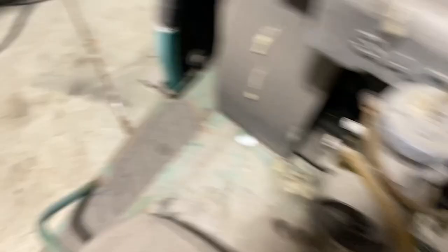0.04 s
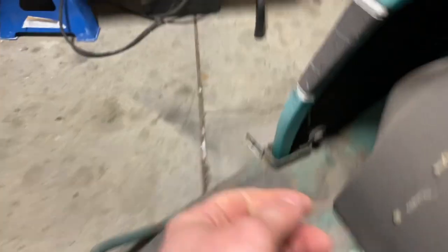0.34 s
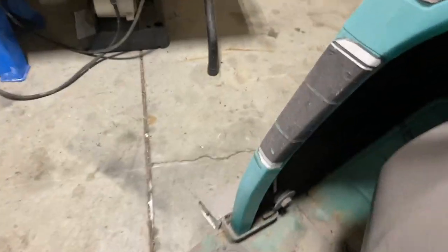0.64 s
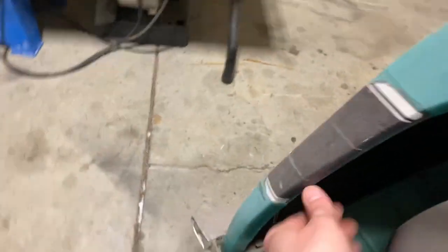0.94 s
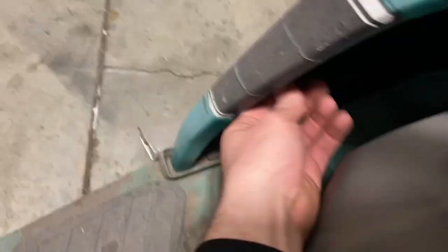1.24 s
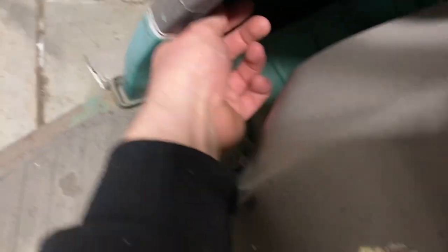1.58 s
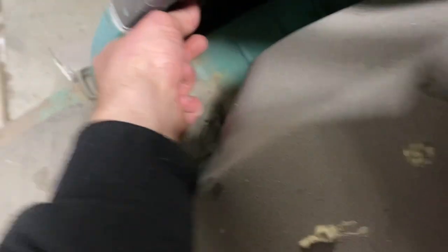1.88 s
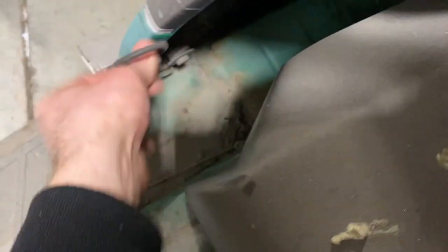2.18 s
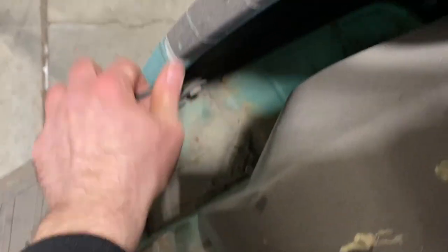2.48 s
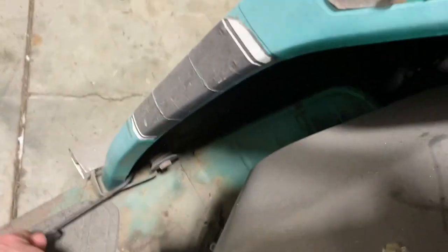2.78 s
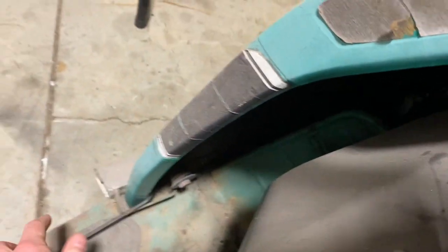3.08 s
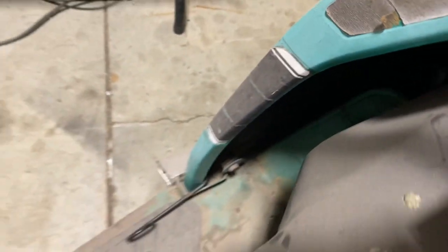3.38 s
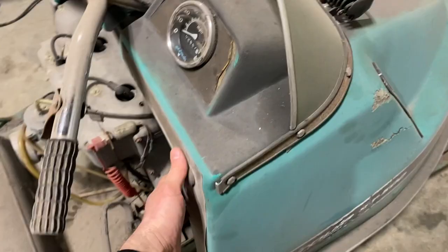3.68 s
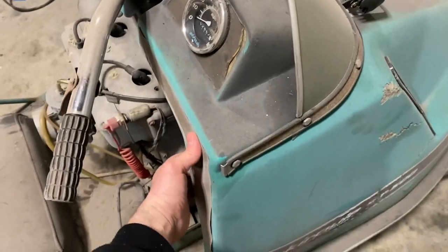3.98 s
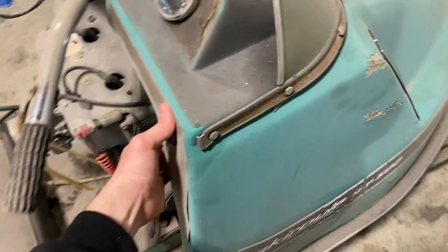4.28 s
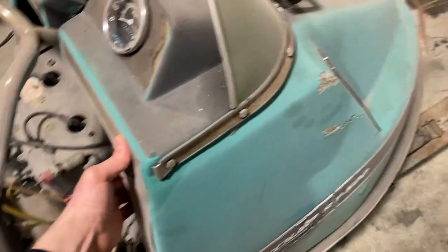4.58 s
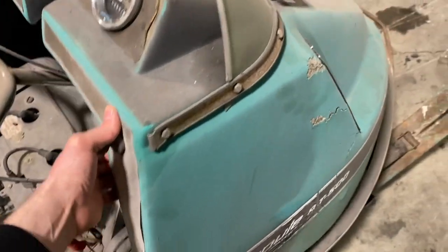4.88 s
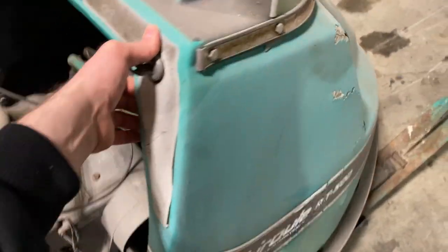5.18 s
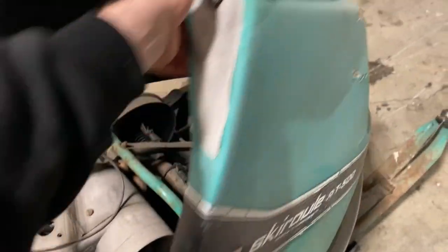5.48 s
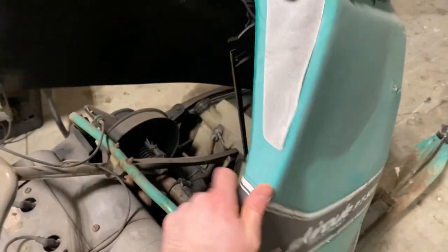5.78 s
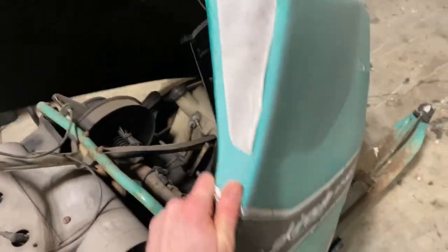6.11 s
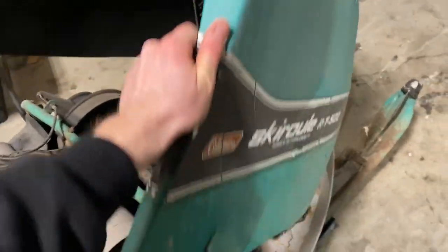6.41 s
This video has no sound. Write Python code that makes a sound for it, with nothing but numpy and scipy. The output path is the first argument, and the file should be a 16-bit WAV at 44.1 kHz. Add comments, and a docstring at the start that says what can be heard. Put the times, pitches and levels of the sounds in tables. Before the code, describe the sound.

A hand bumps and scrapes an old snowmobile's hollow hood, clicks its metal latches and swings it open in a garage.

```python
"""A hand scuffs and bumps an old snowmobile's moulded hood over a faint mains hum, works the metal
latches, then swings the hood open in a garage. Each blow cracks first and booms a moment later as the
shell takes it up. Latch steel clicks, rings and squeals; the rim drags and snags on the chassis.
The hard room answers with a dense tail."""
import sys
import numpy as np
from scipy import signal
from scipy.fft import rfft, irfft, next_fast_len
from scipy.io import wavfile

SR = 44100
rng = np.random.default_rng(int(sys.argv[2]) if len(sys.argv) > 2 else 0)


def dump(signal):
    """Clip the signal to [-1, 1] and save it as 16-bit WAV at the path in sys.argv[1]."""
    limited = np.clip(np.atleast_2d(signal).T, -1, 1)
    pcm = np.round(limited * 32767).astype(np.int16)
    wavfile.write(sys.argv[1], SR, pcm)


N = 293265
TIME = np.arange(N) / SR
BANDS_HZ = 45 * 2 ** (np.arange(18) / 2)

# Hood panel modes. Each row: frequency in Hz, relative level in dB, t60 in seconds.
PANEL_MODES = [(168, 10.5, 0.21), (231, 11.5, 0.13), (262.7, -1.5, 0.3), (299.9, 4, 0.28),
               (341.5, -5, 0.33), (379.7, 5, 0.14), (450.9, 1, 0.16), (520.2, -0.5, 0.14), (620, 2.5, 0.13),
               (652, 5.5, 0.13), (723, 6.5, 0.1), (870, 5.5, 0.077), (1022, 3, 0.072), (1072, 2.5, 0.13),
               (1175, -1, 0.15)]
# Latch and rod modes. Each row: frequency in Hz, relative level in dB, t60 in seconds.
STEEL_MODES = [(1300, -4.5, 0.095), (1302, 12.5, 0.057), (1460, 5.5, 0.074), (1545, 9.5, 0.13),
               (1680, 0.5, 0.077), (1913, 0, 0.43), (2190, 7.5, 0.35), (2390, 8.5, 0.36),
               (2486, 3.5, 0.078), (2662, 4, 0.72), (3270, -4, 0.47), (4104, -11.5, 0.31)]
# Stereo width. Each row: frequency in Hz, side minus mid in dB.
STEREO_WIDTH = [(60, -16), (130, -17), (270, -14), (520, -7), (1000, -3), (2200, -1.5), (5000, -3),
                (11000, -1.5)]


def undb(db):
    """Decibels to gain."""
    return 10 ** (np.asarray(db) / 20)


def read(table, hz):
    """Interpolate (Hz, value) rows on a log-frequency axis."""
    f, value = np.transpose(table)
    return np.interp(np.log(hz), np.log(f), value)


def unit(x):
    """Scale to rms 1."""
    return x / np.sqrt(np.mean(x ** 2) + 1e-18)


def unit_onset(x, size=1100):
    """Scale to rms 1 over the first size samples."""
    return x / np.sqrt(np.mean(x[..., :size] ** 2) + 1e-18)


def fade(t, t60_s):
    """Fall by 60 dB in t60_s."""
    return np.exp(-np.log(1000) * t / np.maximum(t60_s, 1e-3))


def add(out, start_s, x):
    """Mix x in at start_s."""
    i = max(int(start_s * SR), 0)
    out[:, i:i + x.shape[-1]] += x[..., :max(N - i, 0)]


def walk(rate_hz, size):
    """Gaussian values, rate_hz a second, joined by lines."""
    knots = rng.standard_normal(size // 8 + 2)
    return np.interp(np.arange(size) * rate_hz / SR, np.arange(len(knots)), knots)


def noise(gain, size):
    """Stereo noise with spectrum gain(hz): bass alike on both sides, treble out of step."""
    hz = np.maximum(np.arange(size // 2 + 1) * SR / size, 1)
    mid, diffuse = rfft(rng.standard_normal((2, size)))
    direct = np.clip(hz / 11000, 0, .9)
    side = (1j * np.sqrt(direct) * mid + np.sqrt(1 - direct) * diffuse) * undb(read(STEREO_WIDTH, hz))
    return unit(irfft(np.array([mid + side, mid - side]) * gain(hz), size))


def band(centre_hz, size):
    """Half-octave noise."""
    return noise(lambda hz: np.cos(np.pi / 2 * np.minimum(2 * abs(np.log2(hz / centre_hz)), 1)), size)


def resonant_noise(centre_hz, q, size):
    """Noise through one resonance."""
    return noise(lambda hz: 1 / np.hypot(1, q * (hz / centre_hz - centre_hz / hz)), size)


def coloured(spectrum):
    """Scene-long noise shaped by (Hz, dB) rows."""
    return noise(lambda hz: undb(read(spectrum, hz)), next_fast_len(N))[:, :N]


def effort(start_s, swell_s, hold_s, t60_s):
    """Envelope of one push: build, hold, die away."""
    t = TIME - start_s
    return np.clip(t / max(swell_s, 1e-3), 0, 1) * fade(np.maximum(t - swell_s - hold_s, 0), t60_s)


def focus(hz, centre_hz, octaves):
    """A contact's spot and hardness favour the modes near centre_hz."""
    return 1 / (1 + (np.log2(hz / centre_hz) / octaves) ** 2)


def ring(modes, centre_hz, octaves, rise_s, scatter_db=2.5, size=22050):
    """Decaying modes of a struck object; each contact excites them a little differently."""
    hz, db, t60_s = np.transpose(modes)
    t = TIME[:size]
    detune, scatter, phase, side_re, side_im = rng.standard_normal((5, len(hz)))
    poles = 2j * np.pi * hz * (1 + 0.0086 * detune) - np.log(1000) / t60_s
    weight = focus(hz, centre_hz, octaves) * undb(db + scatter_db * scatter) * np.exp(1j * np.pi * phase)
    side = undb(read(STEREO_WIDTH, hz)) * (side_re + 1j * side_im) / np.sqrt(2)
    waves = np.exp(poles.astype(np.complex64)[:, None] * t.astype(np.float32))
    stereo = (weight * np.array([1 + side, 1 - side])) @ waves
    return unit_onset(stereo.imag * (1 - np.exp(-t / rise_s)), size=1500)


def room_tone(air_db=-57, hum_db=-60.5, hum_hz=120):
    """Quiet air and mains hum, both wavering in level."""
    # Each row: frequency in Hz, relative density in dB.
    air_spectrum = [(25, -44), (55, 7), (100, -4), (250, -11.5), (500, -21.5), (1200, -16.5), (2200, -19.5),
                    (3000, -27.5), (6200, -23.5), (16000, -37)]
    air = coloured(air_spectrum) * undb(air_db + .5 * walk(3.4, N))
    hum = np.sqrt(2) * np.sin(2 * np.pi * hum_hz * TIME)
    return air + hum * undb(hum_db + walk(7.9, N))


def hand_scuffs():
    """Skin and sleeve skid on the paint: a bright, grainy hiss."""
    # Each row: start, swell and hold in seconds, level in dB.
    skids = [(0.0, 0.0027, 0.085, -51.5), (0.342, 0.012, 0.035, -46), (1.056, 0.011, 0.011, -31.5),
             (0.6, 0.35, 0.64, -56.5), (1.416, 0.0079, 0.032, -40), (4.023, 0.082, 0.019, -19),
             (4.727, 0.005, 0.046, -35.5), (5.047, .015, 0.018, -54), (5.216, 0.028, 0.064, -59.5),
             (5.48, 0.12, 0.024, -41.5)]
    # Each row: frequency in Hz, relative density in dB.
    skid_spectrum = [(1000, 0), (3000, 5), (7000, 3.5), (10400, 11), (15500, 7.5)]
    push = sum(undb(db) * effort(*timing, t60_s=0.04) for *timing, db in skids)
    return push * unit(coloured(skid_spectrum) * undb(1.3 * walk(150, N) + 1.8 * walk(1300, N)))


def hood_blows(size=8192):
    """Bending waves spread from each contact, treble first; panels, fittings and the whole hood ring."""
    # Hard contacts. Each row: start in seconds, boom in dB, knock in dB, knock centre in Hz,
    # clack in dB, treble tick in dB; levels before the offsets below.
    blows = [(0.266, -39, -39.5, 378, -52.5, -62), (0.452, -29, -32, 320, -63, -74),
             (0.536, -29, -38, 360, -43, -55), (0.688, -32, -34.5, 495, -47, -66),
             (1.082, -56, -29, 407, -44, -62), (1.603, -33, -41, 316, -46, -56),
             (1.727, -54, -30, 740, -27, -44), (1.742, -27.5, -13, 273, -52, -58),
             (1.749, -39, -21, 612, -54, -50), (1.936, -41, -26.5, 543, -26, -30.5),
             (1.996, -12, -17.5, 680, -19, -39), (2.008, -17.5, -15.5, 360, -52, -49),
             (2.196, -29, -33, 393, -35, -39.5), (2.207, -31.5, -33, 574, -35.5, -40),
             (2.221, -42, -24, 466, -24.5, -50), (2.241, -15, -22, 430, -26.5, -33.5),
             (2.527, -37.5, -17, 904, -21, -45), (2.537, -27, -16.5, 363, -54, -70),
             (2.568, -41, -25.5, 1020, -33, -62), (2.594, -16.5, -15.5, 373, -31, -31.5),
             (2.642, -16, -16.5, 390, -22, -28.5), (2.668, -14.5, -14.5, 524, -22, -27),
             (2.692, -22, -21, 1070, -27.5, -43), (2.706, -41.5, -21, 610, -20.5, -31.5),
             (2.723, -42.5, -22.5, 604, -19.5, -41), (2.739, -50, -15.5, 594, -20.5, -37),
             (2.794, -49, -48, 368, -18.5, -28.5), (3.024, -34, -25, 495, -22, -49),
             (3.049, -17, -20.5, 415, -23, -39.5), (3.954, -35, -39, 282, -41, -45.5),
             (4.094, -14.5, -13.5, 452, -31.5, -53), (4.106, -14.5, -24, 900, -27.5, -55),
             (4.116, -20, -20, 297, -26, -48), (4.167, -41.5, -18.5, 355, -28.5, -35),
             (4.205, -47.5, -28.5, 303, -28, -38), (4.275, -21, -22, 348, -34, -53),
             (4.387, -25.5, -26.5, 384, -40, -56), (4.64, -59, -30.5, 240, -61, -70),
             (4.762, -37, -34, 360, -32.5, -31), (4.784, -34.5, -28.5, 415, -30, -58.5),
             (5.655, -47, -23.5, 452, -36, -49), (5.667, -42.5, -20.5, 447, -29.5, -34.5),
             (5.688, -29, -25.5, 312, -44, -62), (5.913, -46, -24.5, 407, -35.5, -69),
             (5.924, -29.5, -22.5, 445, -31, -52), (5.946, -23, -27, 440, -47, -45),
             (6.271, -53, -27.5, 861, -38, -44.5), (6.272, -44, -24.5, 440, -47, -58),
             (6.295, -43, -25.5, 312, -40, -45), (6.362, -28, -24.5, 570, -32, -53),
             (6.407, -46, -23, 433, -28, -38), (6.443, -57, -21.5, 660, -34, -41)]
    # Soft contacts of the hand and the settling hood. Each row: start in seconds, boom in dB as above.
    bumps = [(0.297, -26), (0.349, -28.5), (0.482, -25), (0.735, -32), (1.012, -26), (1.079, -19),
             (1.386, -26.5), (2.254, -23), (2.379, -23.5), (3.073, -22.5), (3.109, -31.5), (4.429, -21.5)]
    # Each grip changes flex and damping. Each row: start in seconds, boom centre in Hz, shell t60 factor.
    grips = [(0, 111.4, 0.89), (0.9, 102.8, 0.43), (1.55, 105, 0.33), (1.9, 101, 0.53), (2.15, 95.5, 0.62),
             (2.5, 113, 0.95), (2.95, 103.5, 0.81), (3.6, 133, 0.87), (5.5, 125, 0.68), (5.88, 59.6, 0.51),
             (6.15, 126, 1)]
    # Bending-wave decay. Each row: frequency in Hz, t60 in seconds before the grip's factor.
    shell_t60 = [(170, 0.44), (500, 0.39), (1500, 0.17), (5000, 0.17), (14000, 0.12)]
    # Whole-hood flexing. Each row: frequency in Hz, relative level in dB, t60 in seconds.
    flex_modes = [(57, 13, 0.14), (70, 6, 0.28), (89.4, 4, 0.3), (107, 7, 0.22), (120, 0, 0.36),
                  (146.4, 0, 0.26)]
    # Flesh barely wakes the panels.
    soft_blows = [(start_s, db, db - 12.5, 275, db - 54, db - 54) for start_s, db in bumps]
    out, t = np.zeros((2, N)), TIME[:size]
    band_noise = {hz: band(hz, 16 * size) for hz in BANDS_HZ[4:]}
    for start_s, boom_db, knock_db, knock_hz, clack_db, tick_db in blows + soft_blows:
        _, boom_hz, t60_factor = grips[sum(grip[0] <= start_s for grip in grips[1:])]
        crack_spectrum = [(250, clack_db - 25), (1100, clack_db - 4), (1700, clack_db - 5),
                          (3000, clack_db - 9), (5500, tick_db - 4), (14000, tick_db - 8)]
        chatter = undb(0.42 * walk(580, size))  # the loose rim rattles as it lands
        offset = rng.integers(15 * size)
        for hz, waves in band_noise.items():
            rise_s = 0.003 * (400 / hz) ** 0.96  # low bending waves travel slowly
            envelope = (1 - np.exp(-(t / rise_s) ** 2)) * fade(t, t60_factor * read(shell_t60, hz))
            thud = undb(knock_db - 12.5) * focus(hz, knock_hz, octaves=5.36) ** 2 / (1 + (hz / 1100) ** 4)
            gain = np.hypot(undb(read(crack_spectrum, hz)), thud)
            add(out, start_s, gain * unit_onset(waves[:, offset:offset + size] * envelope * chatter))
        panels = ring(PANEL_MODES, knock_hz, octaves=0.3, rise_s=0.0022, scatter_db=3.0)
        fittings = ring(STEEL_MODES, centre_hz=1400, octaves=0.33, rise_s=0.0012)
        boom = ring(flex_modes, boom_hz, octaves=0.26, rise_s=0.0015, scatter_db=4.5)
        add(out, start_s + 0.00089, undb(knock_db) * panels)
        add(out, start_s + 0.003163, undb(clack_db - 8) * fittings)
        add(out, start_s + 0.0039, undb(boom_db - 2) * boom)
    return out


def stick_slip(rate_hz, t60_s, spread_db, slide):
    """Friction envelope: random, decaying releases over steady sliding."""
    releases = rng.random(N) < rate_hz / SR
    strength = undb(spread_db * np.clip(rng.standard_normal(N), -2, 2))
    power = signal.fftconvolve(releases * strength ** 2, fade(TIME[:8192], t60_s) ** 2)[:N]
    return np.sqrt(abs(power) / np.mean(power) + slide ** 2)


def hollow_gain(hz, half_width_hz=14):
    """The shell favours its panel frequencies."""
    return 1 + sum(1 / (1 + ((hz - mode[0]) / half_width_hz) ** 2) for mode in PANEL_MODES[1:])


def hood_drag():
    """Dry rubbing over the chassis: the hollow shell judders, the rim scrapes."""
    # Pushes and pulls. Each row: start, swell and hold in seconds, judder in dB, scrape in dB.
    strokes = [(0.274, 0.024, 0.29, -43, -46.5), (0.354, 0.023, 0.0059, -43, -52),
               (0.632, 0.025, 0.005, -39.5, -42.5), (0.723, 0.077, 0.38, -79, -53),
               (0.967, 0.024, 0.032, -42, -53), (1.05, 0.01, 0.0075, -36.5, -38.5),
               (1.33, 0.023, 0.0099, -47.5, -54.5), (1.432, 0.0099, 0.032, -40.5, -47.5),
               (1.586, 0.14, 0.047, -32.5, -36.5), (2.095, 0.077, 0.19, -35.5, -48.5),
               (2.497, 0.19, 0.022, -17.5, -27), (2.784, 0.038, 0.022, -31.5, -47),
               (3.015, 0.11, 0.037, -41, -46.5), (3.596, 0.097, 0.035, -56, -47),
               (4.039, 0.099, 0.1, -19, -23), (4.583, 0.067, 0.17, -34, -41.5),
               (5.461, 0.21, 0.37, -34, -42.5), (5.602, 0.07, 0.016, -26.5, -34),
               (6.226, 0.063, 0.23, -31, -47.5), (6.371, 0.052, 0.013, -36, -29)]
    # Each row of both: frequency in Hz, relative density in dB.
    judder_spectrum = [(40, -2), (70, -18), (120, 9.5), (200, -5.5), (400, -6), (800, -15), (1600, -17),
                       (4000, -43.5)]
    scrape_spectrum = [(300, -37), (900, -21.5), (2200, -16), (4000, -16), (7000, -17.5), (10400, -22),
                       (13500, -24), (15500, -15)]
    judder_power, scrape_power = undb(-60) ** 2, undb(-67) ** 2  # the hand never quite keeps still
    for *timing, judder_db, scrape_db in strokes:
        judder_power += (undb(judder_db) * effort(*timing, t60_s=0.79)) ** 2
        scrape_power += (undb(scrape_db) * effort(*timing, t60_s=0.64)) ** 2
    slips = stick_slip(rate_hz=50, t60_s=0.17, spread_db=6.5, slide=0.97)
    rasp = stick_slip(rate_hz=330, t60_s=0.015, spread_db=3.0, slide=1.0)
    body = noise(lambda hz: undb(read(judder_spectrum, hz)) * hollow_gain(hz), next_fast_len(N))[:, :N]
    judder = unit(body * slips)
    scrape = unit(coloured(scrape_spectrum) * rasp)
    return judder * np.sqrt(judder_power) + scrape * np.sqrt(scrape_power)


def clicks_and_scuffs(size=4096, ring_size=33075):
    """Sharp clicks and short bright scuffs, some followed by a shimmering metallic ring."""
    # Each row: start in seconds, level in dB, centre in Hz, t60 in seconds, Q, ring trim in dB.
    bursts = [(0.34, -33.5, 9460, 0.052, 1.1, -10), (0.452, -43.5, 3800, 0.085, 4.8, -12),
              (0.854, -38, 6600, 0.016, 14, -40), (1.064, -38.5, 3200, 0.054, 1.8, -25),
              (1.077, -42, 3240, 0.06, 5, -16), (1.604, -36, 9800, 0.047, 1.5, -8),
              (1.687, -22.5, 7950, 0.062, 1, -7), (1.7, -21, 9700, 0.065, 0.31, -28),
              (1.745, -21, 8600, 0.11, 0.32, -28), (1.89, -31.5, 9800, 0.069, 0.37, -31.5),
              (1.936, -17, 9340, 0.013, 1.5, -23), (1.989, -18, 10600, 0.088, 1, -30),
              (1.994, -16.5, 3030, 0.078, 3, -35), (2.24, -25, 9350, 0.043, 0.55, -27),
              (2.269, -30, 10900, 0.055, 0.48, -26), (2.516, -33.5, 8900, 0.08, 2.2, -1),
              (2.658, -22, 4260, 0.03, 4, -16), (2.741, -24, 7200, 0.021, 1.3, -31),
              (2.796, -24, 1530, 0.072, 3.1, 6), (3.026, -19, 7600, 0.016, 0.61, -19),
              (3.027, -18, 2564, 0.11, 4.3, -4), (3.049, -19.5, 4650, 0.02, 4.8, -36),
              (3.349, -52.5, 3870, 0.028, 7.4, -39), (3.945, -23, 11340, 0.11, 0.81, -38),
              (4.217, -18, 7800, 0.031, 1.5, -6.5), (4.688, -34, 10300, 0.042, 2.3, -29.5),
              (4.760, -18.5, 4030, 0.09, 2.4, -40), (4.77, -20.5, 6050, 0.037, 0.85, -27),
              (4.795, -22, 2240, 0.021, 1.6, -11), (5.922, -29, 1670, 0.072, 3.4, 2),
              (6.361, -17, 3880, 0.078, 0.62, -9), (6.364, -36, 9700, 0.04, 1.1, -31)]
    out, t = np.zeros((2, N)), TIME[:size]
    for start_s, db, centre_hz, t60_s, q, ring_db in bursts:
        burst = resonant_noise(centre_hz, q, size)
        envelope = (1 - np.exp(-t * centre_hz / 3)) * fade(t, t60_s)  # builds over a few cycles
        grain = undb(2.2 * walk(1360, size))
        add(out, start_s, undb(db) * unit_onset(burst * envelope * grain, size=440))
        tone = ring(STEEL_MODES, centre_hz, octaves=0.22, rise_s=0.00061, size=ring_size)
        shimmer = undb(3.5 * walk(60, ring_size))
        add(out, start_s, undb(db + ring_db - 12) * tone * shimmer)
    return out


def rim_snags(size=2048):
    """The dragged rim hangs on an edge and breaks free with a dry crack."""
    # Each row: start in seconds, level in dB, centre in Hz.
    snags = [(2.592, -37, 3800), (2.643, -23.5, 3600), (2.668, -24.5, 4600), (2.68, -25.5, 3600),
             (2.693, -26, 2300), (2.695, -31, 5500), (2.706, -18, 3506), (2.718, -22.5, 3100),
             (2.738, -20.5, 3000), (2.753, -28.5, 2010), (2.776, -26, 2420), (2.819, -25.5, 3800),
             (4.083, -39, 3170), (4.134, -29, 4400), (4.176, -21.5, 6600), (4.181, -25, 4700),
             (4.205, -27, 2500), (4.247, -26, 7000), (4.756, -26, 4000)]
    out = np.zeros((2, N))
    for start_s, db, centre_hz in snags:
        crack = resonant_noise(centre_hz, q=3.3, size=size) * fade(TIME[:size], t60_s=0.028)
        add(out, start_s, undb(db) * unit_onset(crack, size=220))
    return out


def squeals():
    """Steel squeals or the shell groans under load: uneven slips make a short, rough tone."""
    # One table per tone. Each row: time in seconds, slip rate in Hz, level in dB.
    glides = [
        [(2.785, 1490, -21), (2.805, 1554, -22), (2.828, 1561, -17.5), (2.84, 1540, -32)],
        [(4.736, 4400, -38), (4.76, 4270, -34)],
        [(4.795, 2180, -23), (4.807, 2140, -28)],
        [(5.36, 477, -58), (5.385, 459, -47), (5.415, 484, -68)],
        [(2.668, 610, -18.5), (2.712, 620, -25.5), (2.735, 636, -9.5), (2.778, 645, -26)],
        [(2.645, 112, -23), (2.698, 120, -16), (2.72, 122, -33.5)],
        [(4.038, 2190, -49), (4.085, 2340, -30.5), (4.13, 2340, -40)],
        [(2.69, 1400, -21), (2.72, 1415, -23), (2.765, 1420, -43.5)],
        [(5.81, 280, -48), (5.845, 290, -31), (5.885, 285, -34)],
    ]
    out = np.zeros((2, N))
    for glide in glides:
        times_s, hz, db = np.transpose(glide)
        t = np.arange(times_s[0], times_s[-1], 1 / SR)
        slip_hz = np.interp(t, times_s, hz) * (1 + 0.039 * walk(822, len(t)))
        phase = 2 * np.pi * np.cumsum(slip_hz) / SR
        tone = np.sin(phase + np.array([[0], [1.2]])) + 0.05 * np.sin(2 * phase)
        roughness = undb(1.1 * walk(363, len(t)))
        add(out, times_s[0], unit(tone * roughness) * undb(np.interp(t, times_s, db)))
    return out


def garage_echo(x, size=52920):
    """Concrete and bare walls return a dense tail, band by band."""
    # Each row: frequency in Hz, echo level in dB.
    echo_levels = [(60, -8), (150, -5), (400, -12.5), (1000, -13.5), (2500, -11), (4300, -14), (7000, -10),
                   (14000, -14)]
    # Each row: frequency in Hz, t60 in seconds.
    room_t60 = [(60, 1), (200, 0.33), (1000, 0.27), (2500, 1.0), (6000, 0.57), (14000, 0.094)]
    t = TIME[:size]
    onset = np.clip((t - .006) / 0.00054, 0, 1)
    tail = 0
    for hz in BANDS_HZ:
        echo = unit(band(hz, size) * onset * fade(t, read(room_t60, hz))) / np.sqrt(size)
        band_share = hz * np.log(2) / SR
        tail += echo * undb(read(echo_levels, hz)) * np.sqrt(band_share)
    return signal.fftconvolve(x, tail, axes=1)[:, :N]


def scene():
    """Hood and latches, close by and near centre, in the garage."""
    # Each row: time in seconds, left minus right in dB.
    balance = [(1.3, 0), (1.7, 0.5), (2.2, 0), (4.2, 0), (4.7, 0.5), (6.5, 0.5)]
    balance_db = np.interp(TIME, *np.transpose(balance))
    near = hood_blows() + clicks_and_scuffs() + rim_snags() + squeals() + hood_drag() + hand_scuffs()
    near *= undb(balance_db * np.array([[.5], [-.5]]))
    return near + garage_echo(near) + room_tone()


def record(dry, low_hz=38, top_hz=16300):
    """Microphone: deep bass shed, treble rippled by its ports, peaks rounded, top cut."""
    # Each row: frequency in Hz, gain in dB.
    port_response = [(900, -0.5), (7000, -7.5), (8300, -13.5), (9300, -6), (10500, -3), (11300, -9.5),
                     (12200, -35.5), (13500, -10), (14800, -23.5), (16200, -51)]
    hz = np.linspace(0, SR / 2, 513)
    port_power = undb(read(port_response, hz + 1)) ** 2  # minimum_phase takes the square root
    ports = signal.minimum_phase(signal.firwin2(511, hz, port_power, fs=SR), n_fft=8192)
    thinned = signal.sosfilt(signal.butter(4, low_hz, "highpass", fs=SR, output="sos"), dry)
    rounded = np.tanh(0.75 * signal.lfilter(ports, 1, thinned)) / 0.8
    return signal.sosfilt(signal.ellip(8, .2, 70, top_hz, fs=SR, output="sos"), rounded)


dry = scene()
out = record(dry)
dump(out)
```